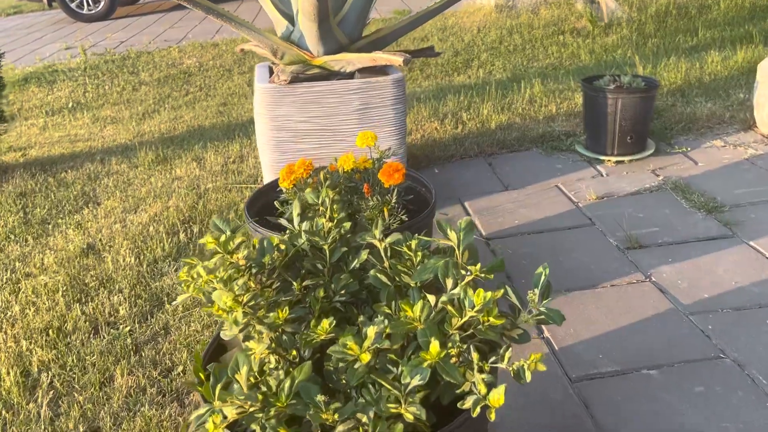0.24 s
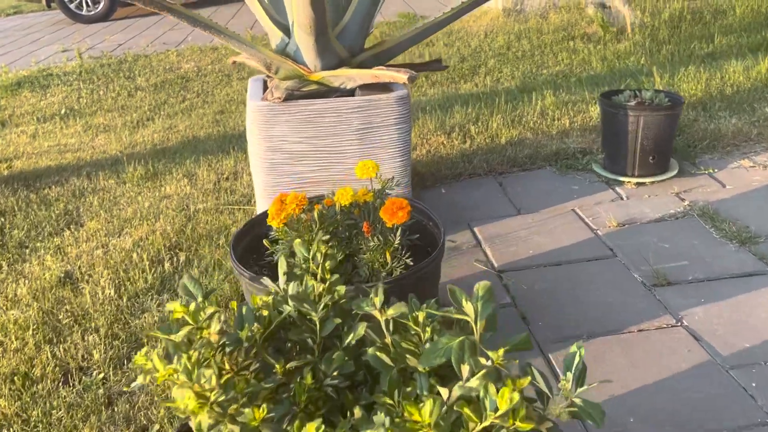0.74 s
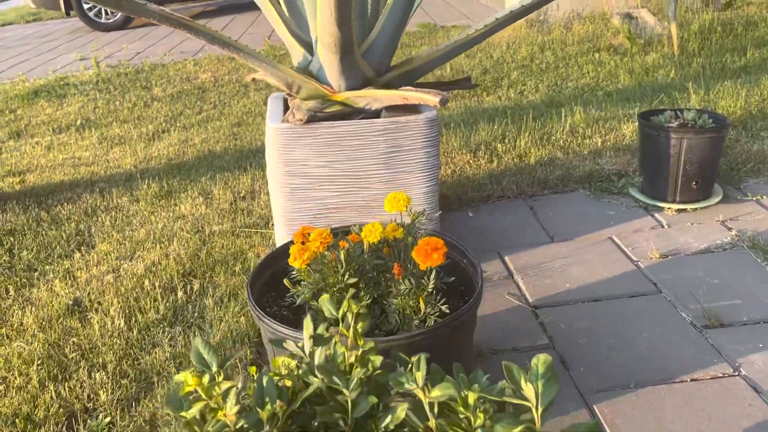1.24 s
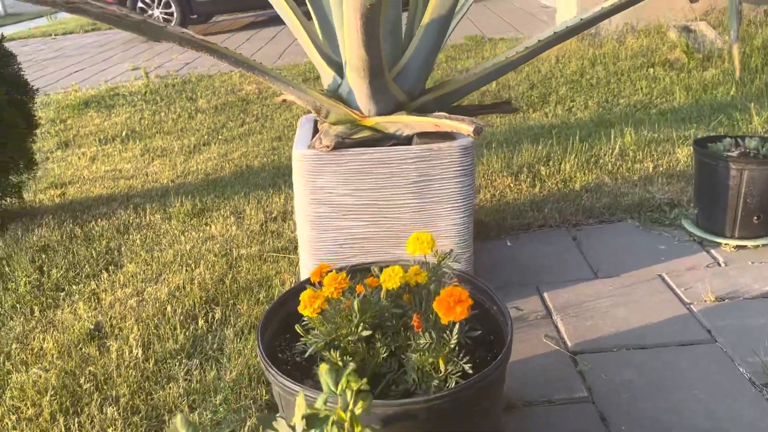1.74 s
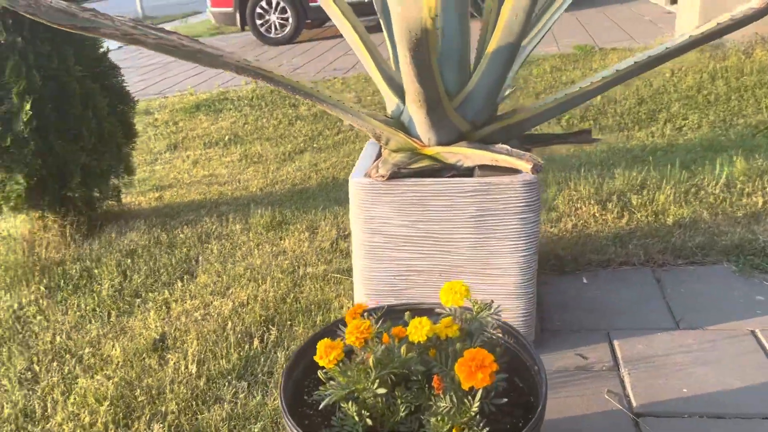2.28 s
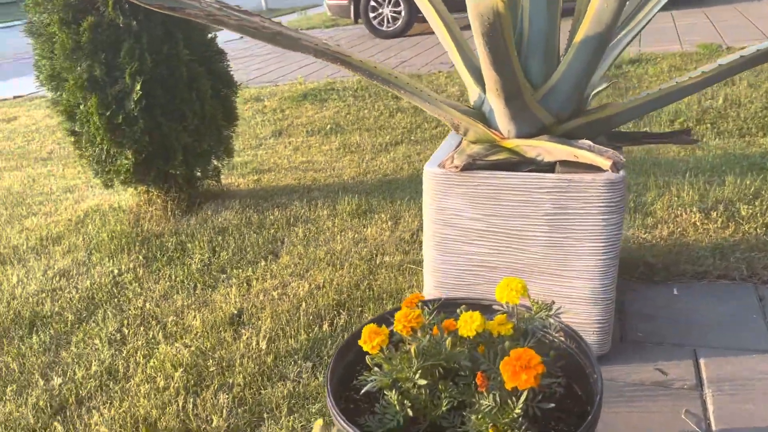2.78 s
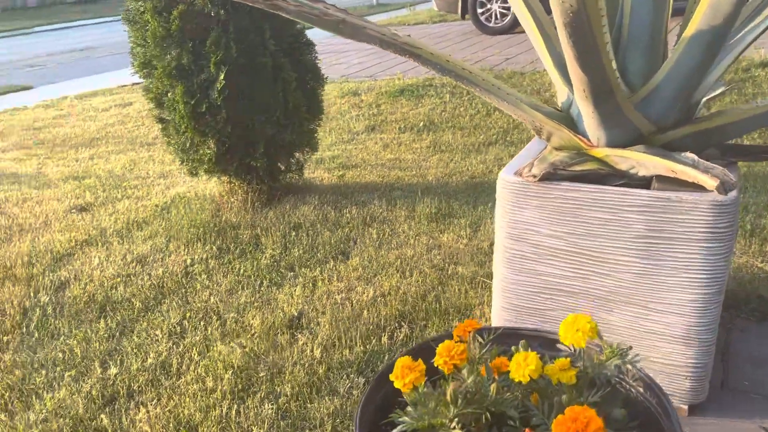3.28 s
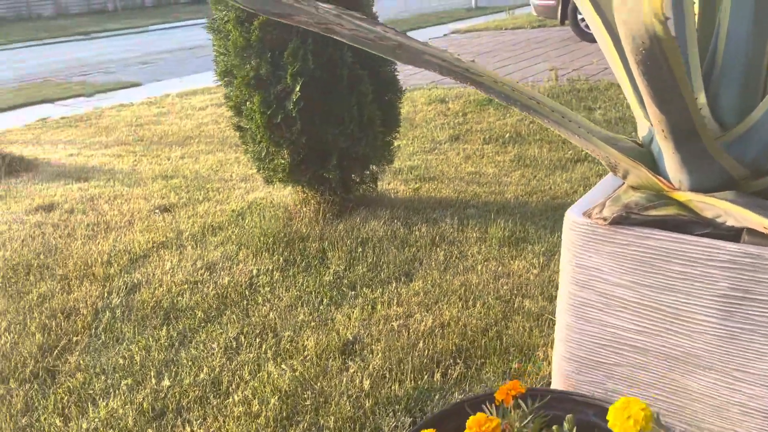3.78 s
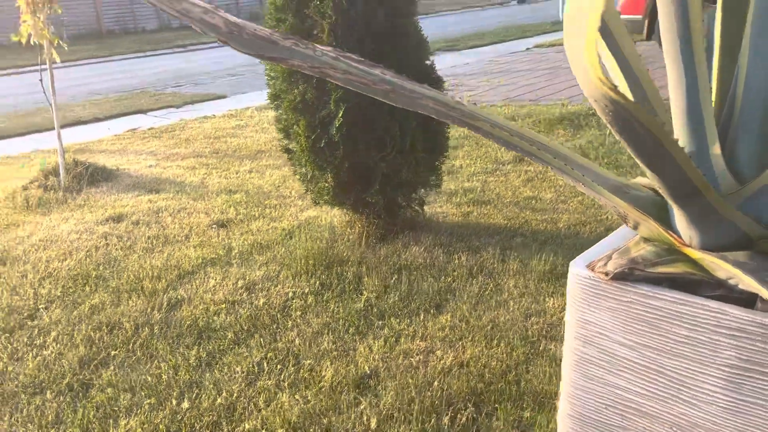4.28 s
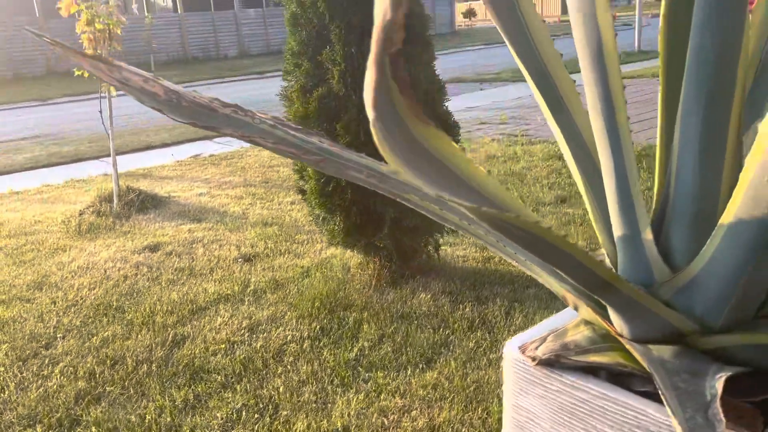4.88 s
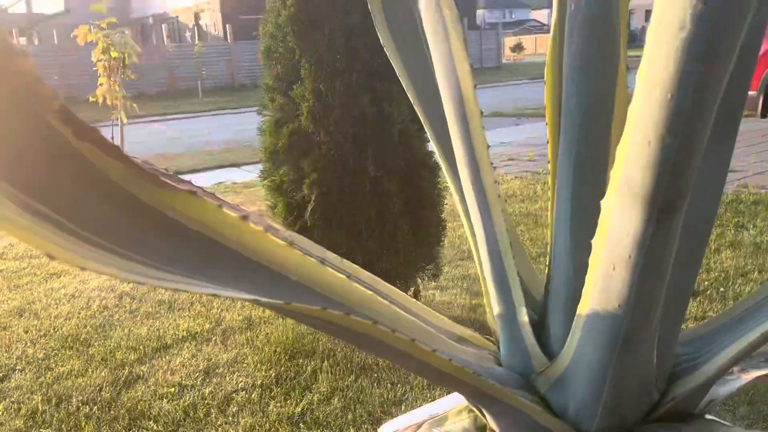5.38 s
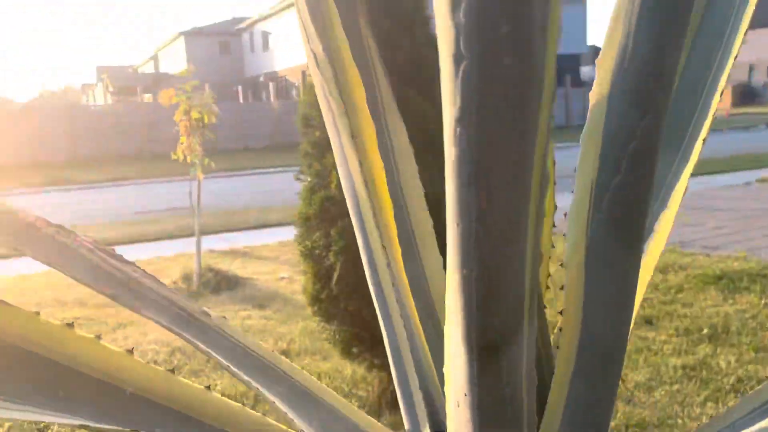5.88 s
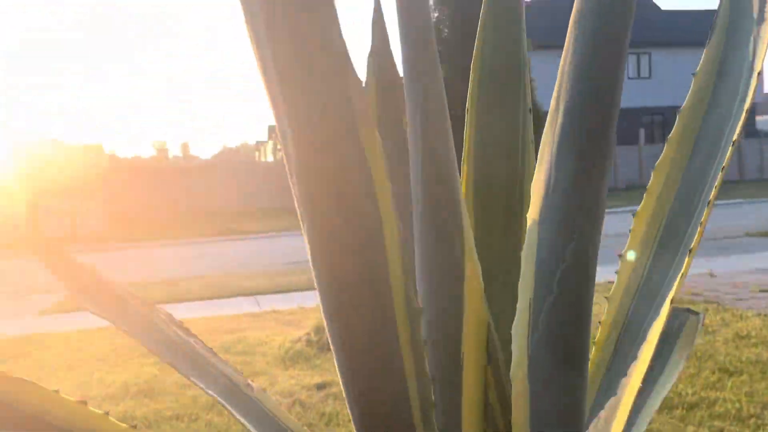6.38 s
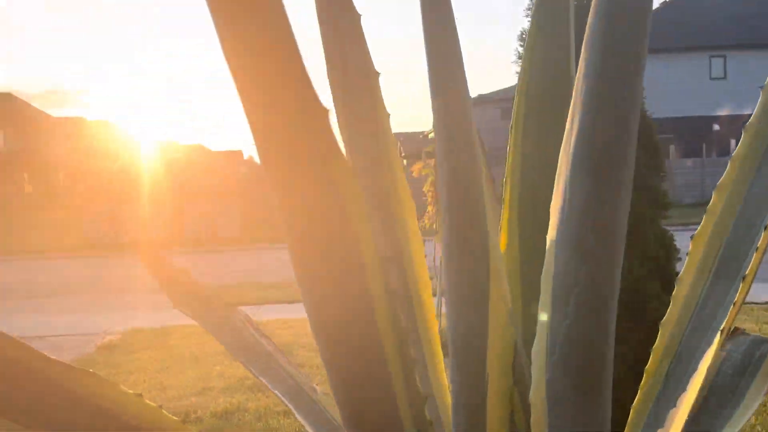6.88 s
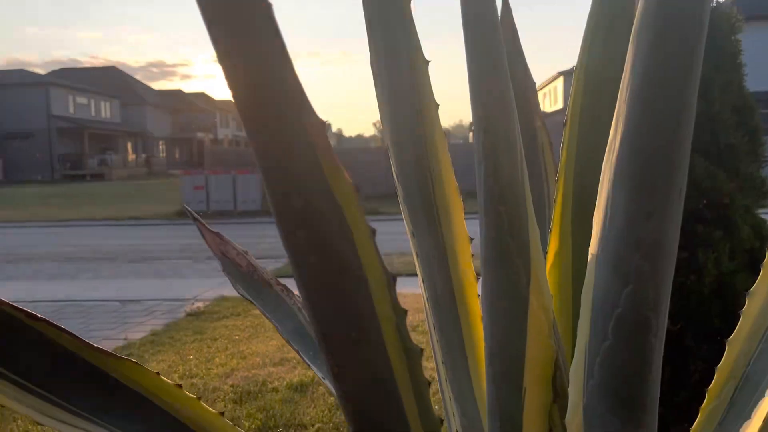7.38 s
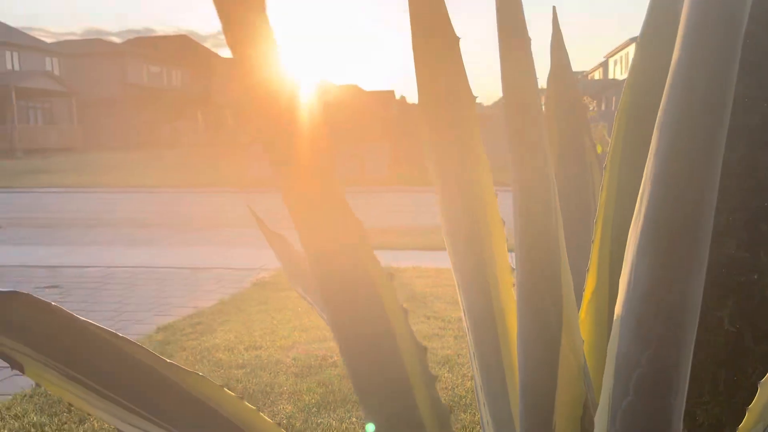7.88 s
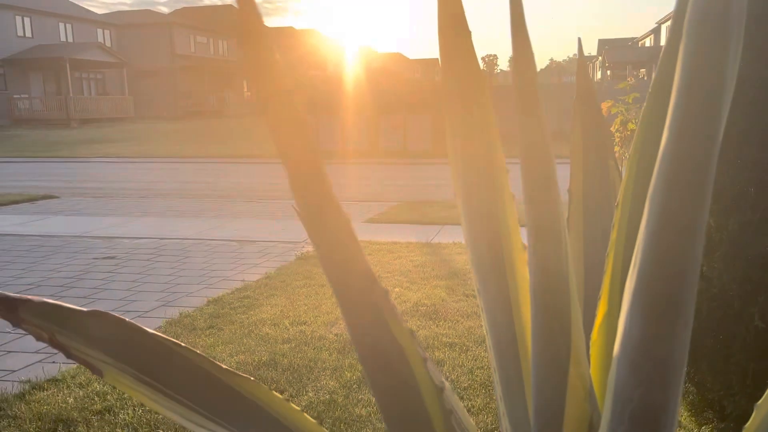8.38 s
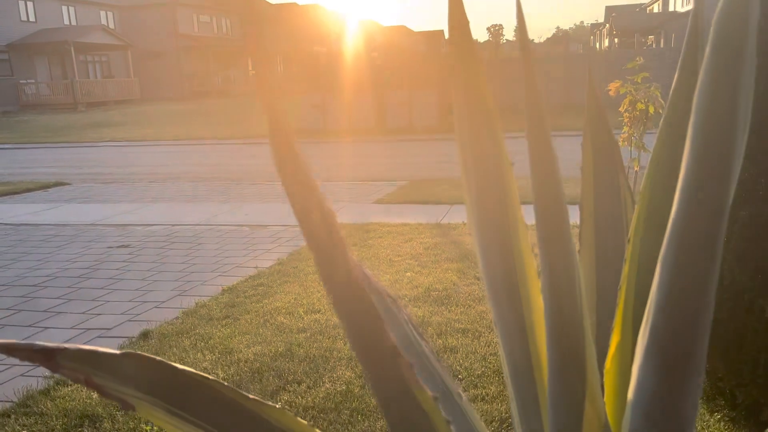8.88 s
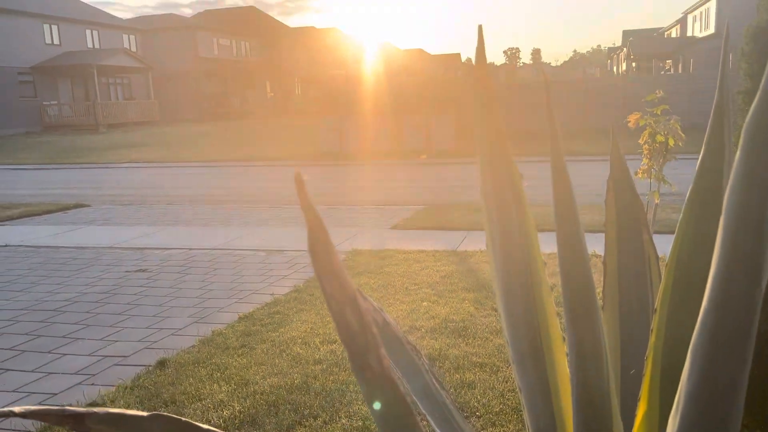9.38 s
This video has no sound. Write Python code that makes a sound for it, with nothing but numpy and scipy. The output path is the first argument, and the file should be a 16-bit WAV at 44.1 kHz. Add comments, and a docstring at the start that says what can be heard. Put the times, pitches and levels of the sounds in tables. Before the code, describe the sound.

Small birds trade slurred whistles and raspy chatter in a suburban yard, over a distant engine's low drone and light scuffing footsteps.

```python
"""Small birds trade slurred whistles, closing flicks, thin high notes, raspy chatter and a dry trill.
They are gliding, unsteady tones, blurred or echoed by leaves and houses in a suburban yard at dawn.
A distant engine (a few sine tones) rises and sags over the town's filtered noise and a faint two-tone hum.
Someone with a camera steps and scuffs over paving and grass, and later clothing or a hand likely rubs:
bursts of filtered, crackling noise. Twice a finger knocks the camera's case, which rings."""
import sys
import numpy as np
from scipy import signal
from scipy.fft import rfft, irfft
from scipy.io import wavfile
from scipy.ndimage import uniform_filter1d

SR = 44100
rng = np.random.default_rng(int(sys.argv[2]) if len(sys.argv) > 2 else 0)


def dump(signal):
    """Clip the signal to [-1, 1] and save it as 16-bit WAV at the path in sys.argv[1]."""
    limited = np.clip(np.atleast_2d(signal).T, -1, 1)
    pcm = np.round(limited * 32767).astype(np.int16)
    wavfile.write(sys.argv[1], SR, pcm)


N = 425124
T = np.arange(N) / SR

# the town's level: (time [s], rumble [dB], wash [dB])
TOWN_LEVELS = [(0, -50.5, -63.5), (.9, -47.5, -61), (2.5, -49, -56.5), (3.2, -44.5, -57.5), (4.3, -47, -58),
               (5.3, -45, -57), (6.5, -48, -58), (7.4, -49.5, -59.5), (8.099, -46, -59.5), (9.64, -47, -58)]
# colour of the town's low rumble and of its higher wash: (frequency [Hz], relative level [dB per Hz])
RUMBLE_COLOUR = [(15, -10), (30, 1.5), (45, -8.5), (60, 4.5), (90, -1.5), (130, -6), (220, -11.5),
                 (320, -18), (500, -28.5), (900, -71.5)]
WASH_COLOUR = [(150, -1), (350, -4.5), (550, -2.5), (900, 2.5), (1300, 0.5), (2000, -4), (3000, -15),
               (4400, -14), (5300, -23.5), (7000, -28), (10000, -40.5), (14000, -40.5), (16000, -65.5)]

# the far engine, one curve a pull: (time [s], firings [per s], first order [dB], third order [dB])
ENGINE_PULLS = [
    [(0, 70.6, -69, -62), (.35, 71.8, -61, -60), (.75, 75.5, -49, -56), (1.15, 77.5, -52.5, -62),
     (1.5, 80, -55, -65)],
    [(1.55, 53.5, -61, -65), (1.9, 57, -41.5, -54.5), (2.35, 58.4, -44.5, -57), (2.57, 59.5, -57.5, -63.5),
     (2.72, 62.6, -37.5, -68.5), (3.0, 68, -49.5, -55.5), (3.3, 71, -40, -52), (3.45, 70.5, -47, -53),
     (3.7, 61.2, -45.5, -65.5), (4.1, 59.2, -46, -61.5), (4.5, 63, -39.5, -61), (5.15, 66.3, -37.5, -53.5),
     (5.4, 64.5, -45, -68), (5.7, 62, -47, -64), (6.1, 60, -59, -61.5)],
    [(6.25, 77.8, -59, -82), (6.42, 77.5, -44, -73), (7.1, 74, -50, -75.5), (7.44, 74, -43, -69),
     (7.52, 74, -52.5, -65.5), (7.75, 74.3, -32.5, -89), (8.01, 75, -49.5, -62), (8.18, 75.5, -38, -60.5),
     (8.35, 76, -41.5, -68), (8.8, 77, -39.5, -78), (9.12, 77.6, -48, -64), (9.64, 79.3, -39.5, -74)],
]
SECOND_DB = -10  # the second order against the mean of its neighbours

# a far machine's tones, before the swell: (frequency [Hz], level [dB])
HUM_TONES = [(628, -74), (1255, -80.5)]
# how the hum swells and sinks: (time [s], change of level [dB])
HUM_SWELL_CURVE = [(0, -1.5), (.6, -2.5), (1, 7), (1.55, 4), (1.9, 0.5), (3.6, 2), (6, 0), (7.05, 4.5),
                   (7.8, -0.5), (8.7, 6), (9.64, 1)]

# scuffs and rubs: shoes scraping and brushing, later (from about 7.96 s) likely clothing or a hand:
# (time [s], length before dying away [s], swell [s], scrape [dB], grit [dB], time to fall 60 dB [s])
SCUFF_EVENTS = [ (0.05, .04, 0.027, -91, -80, .25), (0.329, .012, 0.0054, -56, -63, .11),
                (0.358, 0.073, .017, -68, -79, .26), (0.977, 0.034, .02, -93, -83, .26),
                (1.07, 0.02, 0.013, -85, -65.5, 0.21), (1.637, 0.054, 0.015, -71, -70, 0.42),
                (1.831, .029, .006, -65, -70, .2), (2.156, 0.25, 0.081, -88, -74, 0.3),
                (2.971, .07, 0.028, -71, -77, 1), (3.365, 0.021, 0.016, -66.5, -71, 0.28),
                (3.438, .05, .03, -74, -75, 0.16), (3.961, 0.028, 0.0038, -53.5, -55, 0.19),
                (4.09, 0.23, .04, -91, -87, .3), (4.447, 0.12, 0.077, -90, -80, 0.36),
                (4.597, 0.024, 0.027, -61, -68.5, .18), (4.98, 0.14, 0.041, -78, -83, 0.22),
                (5.138, 0.047, 0.025, -68, -70.5, 0.52), (5.52, 0.023, .01, -78, -72.5, .15),
                (5.986, .05, .025, -74, -67.5, .33), (6.247, .11, .1, -73, -77.5, .2),
                (6.36, .04, 0.038, -66, -69, 0.13), (6.55, 0.13, 0.1, -63, -62.5, 0.31),
                (6.757, .045, 0.0081, -41, -46.5, 0.11), (7.088, 0.039, 0.053, -61, -67, 0.33),
                (7.588, 0.034, 0.016, -54, -58.5, 0.26), (7.866, 0.19, 0.033, -68, -78, 0.11),
                (7.955, 0.18, 0.03, -59, -57, 0.37), (8.144, 0.21, 0.037, -64, -68, 0.44),
                (8.397, .13, 0.036, -69, -61, .053), (8.583, 0.035, 0.011, -77, -78, .05),
                (8.62, 0.068, 0.014, -62, -55, 0.11), (9.043, 0.09, 0.029, -63.5, -68.5, .15),
                (9.25, .098, 0.032, -70, -75, 0.11), (9.294, 0.071, 0.02, -63, -56, 0.22)]
# grit cracking and sharp taps: (time [s], time to fall 60 dB [s], centre [Hz], body [dB], grit [dB])
CLICK_EVENTS = [ (.3268, .011, 900, -37, -70), (.38, .012, 5000, -69, -47), (.4145, .009, 5500, -50, -37),
                (.4495, .009, 4000, -56, -52), (1.028, .008, 5000, -72, -54),
                (1.6705, .014, 6000, -54, -36.5), (1.6855, .012, 6000, -64, -48),
                (1.7108, .014, 3300, -39.5, -37), (1.8336, .012, 3200, -35.5, -22.5),
                (2.17, .015, 4000, -68, -56), (1.84, .017, 3300, -46, -54), (3.011, .015, 1400, -56, -58),
                (3.115, .01, 4000, -75, -59), (3.388, .015, 4000, -62, -59), (3.965, .018, 1400, -46, -47),
                (4.40, .012, 3200, -56.5, -60), (4.475, .01, 4000, -68, -57), (4.5525, .02, 5000, -70, -52),
                (6.034, .024, 4500, -56, -49), (7.2101, .014, 1500, -34.5, -45),
                (7.213, .04, 330, -41, -68), (7.606, .016, 1300, -39.5, -41), (7.618, .016, 1500, -45, -48),
                (8.6215, .006, 2600, -28, -26.5), (9.3215, .018, 780, -35.5, -45)]
# colour of rubbing grit, and the sharper colour of a cracking grain: (frequency [Hz], relative level [dB per Hz])
GRIT_COLOUR = [(500, -22), (3000, -9.5), (6500, 0.5), (8500, -4.5), (10500, -5), (12500, -4.5),
               (14200, -3.5), (16000, -19)]
SNAP_COLOUR = [(500, -26), (3000, -29), (6500, -12.5), (8500, 1), (10500, -5.5), (12500, 1.5), (14200, 2.5),
               (16000, 5.5)]
# a harder press scrapes lower: scrape levels and the centre frequencies that go with them
SOFT_DB, HARD_DB, SOFT_HZ, HARD_HZ = -71, -57.5, 4000, 1300
# single grains snapping in a sliding contact: average rate, size of the surges, time constant of their fading
CRACKLE_PER_S, CRACKLE_DB, CRACKLE_S = 50, 2, .0015

# slurred whistles: (time [s], length [s], opening hook [s], hook [Hz], dip [Hz], crest [Hz],
# hook [dB], dip [dB], climb [dB])
WHISTLE_CALLS = [ (.305, .22, 0.05, 4630, 4030, 4220, -67, -75, -69),
                 (1.2, 0.27, 0.056, 4660, 3970, 4320, -68, -72, -75.5),
                 (1.24, .28, 0.053, 4740, 3950, 4300, -68, -85, -73),
                 (2.095, 0.23, 0.064, 4705, 3910, 4400, -68.5, -71, -57.5),
                 (2.689, 0.3, 0.078, 4700, 4220, 4500, -76, -82, -79.5),
                 (3.42, 0.3, 0.045, 4500, 3870, 4420, -62, -75, -65),
                 (3.46, 0.23, .05, 4560, 4120, 4500, -78, -84, -76),
                 (4.213, 0.24, 0.1, 4700, 4130, 4530, -68.5, -75.5, -70.5),
                 (4.655, 0.26, 0.047, 4540, 3830, 4350, -57, -65, -65.5),
                 (5.09, 0.21, 0.073, 4830, 4190, 4450, -70, -75, -77),
                 (5.94, 0.27, 0.059, 4700, 4140, 4670, -69, -80, -68.5),
                 (5.977, 0.32, 0.037, 4480, 3980, 4490, -59, -72, -65.5),
                 (6.785, .235, .05, 4740, 3960, 4590, -56, -62, -65),
                 (6.825, 0.2, 0.063, 4740, 4280, 4660, -72, -75, -72),
                 (7.453, .185, 0.045, 4740, 4300, 4720, -63, -64.5, -62.5),
                 (7.895, .255, 0.05, 4700, 3930, 4500, -66, -77, -69)]
HOOK_SCOOP, HOOK_TOP = .045, 0.401  # a hook slides up from this share below its top, reached at this share of it
CLIMB_POWER = 1.2  # the climb starts flat and steepens
CREST_DB = 1  # the crest is this much louder than the middle of the climb

# the flicks that close the whistles: (time [s], rise [s], fall [s], top [Hz], end [Hz], level [dB])
FLICK_CALLS = [ (0.503, 0.045, 0.027, 4500, 3800, -67), (1.48, 0.031, 0.07, 4520, 3840, -68.5),
               (1.53, 0.016, 0.089, 4440, 3820, -69.5), (2.345, 0.031, 0.057, 4540, 3580, -63),
               (3.685, 0.024, 0.044, 4430, 3940, -64), (3.72, 0.028, 0.072, 4630, 3970, -67),
               (4.502, 0.021, 0.033, 4650, 4360, -68), (4.756, 0.04, 0.034, 4400, 4100, -72),
               (4.945, 0.013, 0.052, 4430, 3700, -63.5), (5.385, 0.03, .04, 4670, 4560, -74.5),
               (5.47, .02, 0.082, 4360, 3920, -84), (6.234, 0.022, 0.087, 4770, 4260, -69),
               (6.239, 0.018, 0.078, 4480, 3470, -65.5), (6.315, .02, 0.068, 4490, 4100, -66),
               (7.049, 0.023, .065, 4790, 4130, -66), (7.063, 0.011, 0.055, 4370, 3770, -60),
               (7.086, 0.011, 0.065, 4700, 4050, -71), (7.15, 0.0413, 0.039, 4280, 4180, -66.5),
               (7.272, 0.015, 0.054, 4360, 3730, -67.5), (7.667, 0.039, 0.045, 4760, 4420, -69.5),
               (8.154, 0.019, 0.059, 4600, 3780, -61)]
FLICK_SCOOP_HZ_PER_S = 4600  # average pace of a flick's rise
FLICK_POWER, FLICK_END_DB = 1.5, -0.5  # it falls ever faster; its end against its start

# thin notes: (time [s], length [s], top pitch [Hz], level [dB])
PEEP_CALLS = [(0.506, 0.063, 6700, -81.5), (0.9, 0.25, 5610, -79), (1.088, 0.23, 5400, -81),
              (2.232, 0.044, 6950, -77), (3.412, 0.036, 6660, -74), (4.554, 0.15, 5770, -77),
              (4.702, 0.063, 5570, -76), (6.42, 0.021, 5700, -72), (6.55, 0.033, 5650, -74),
              (7.236, 0.025, 5780, -71), (8.39, 0.065, 4800, -69)]
PEEP_ARCH = 0.04  # each starts and ends this share below its top

# three-syllable chatter: (time [s], first syllable [dB], second [dB], third [dB])
CHATTER_CALLS = [(.615, -74, -63, -62), (2.531, -68, -61, -64.5), (3.765, -69, -59, -60),
                 (4.892, -65, -55, -59), (6.326, -69, -62, -58), (7.712, -59, -56, -56),
                 (8.837, -58, -54.5, -57)]
# its syllables, a drop, a two-voiced zigzag and a rise; each sweep:
# (time after the start [s], length [s], start [Hz], middle [Hz], end [Hz], change of level [dB])
SYLLABLE_SWEEPS = [
    [(0, .028, 4600, 4150, 3300, 0)],
    [(.032, .032, 4500, 4900, 4650, -13), (.046, .034, 3050, 3200, 3950, -6),
     (.057, .027, 4750, 3900, 3000, 0)],
    [(.112, .038, 2950, 3700, 4000, 0)],
]
RASP_HZ, RASP_SHARE = 260, .035  # shakes a second, and their share of the pitch
LEAVES_T60, LEAVES_DIRECT_DB, LEAVES_WET_DB = .12, -2.5, -4  # time to fall 60 dB [s], clear call, blur

# a dry trill of even ticks, loudest midway: start, spacing, base pitch, top level, ends against the top
TRILL_S, TRILL_GAP_S, TRILL_HZ, TRILL_DB, TRILL_ENDS_DB = 5.639, 0.063, 2900, -58.5, -3

# how the camera's case rings: (frequency [Hz], relative level [dB], time to fall 60 dB [s])
CASE_RINGS = [(230, -32, 0.054), (670, -20, 0.01), (728, -25.5, 0.027), (1410, -30.5, 0.023),
              (2440, -44.5, 0.016)]
# a finger bumps the case: (time [s], gain on the ring [dB])
KNOCK_EVENTS = [(7.2115, -19.5), (8.6228, -3.5)]
# the hand shifts on the case: (time [s], length [s], centre [Hz], level [dB])
RUB_EVENTS = [(9.046, 0.75, 397, -61.5), (9.311, 0.07, 760, -57.5)]
RUB_GRIT_DB = -23  # skin carries little grit: its level against the body of the rub
RUB_RISE, RUB_T60 = 0.11, .22  # share of the length spent swelling; time to fall 60 dB [s]

# how alike far noise is at the two microphone ports: (frequency [Hz], likeness, held within 0-1)
PORT_LIKENESS = [(60, 4), (130, 0.93), (290, 0.78), (640, 0.29), (1400, 0.24), (4000, 0.27), (12000, 2)]
# how far the right port leads: (frequency [Hz], phase [radians])
PORT_LEAD = [(400, 0), (1000, 1.7), (1550, 2.5), (1900, 5.4), (4600, 5.6), (5500, 7.5), (6800, 8),
             (8200, 9.4), (9300, 9.7), (10500, 12.1), (12700, 12.7), (14500, 15.4)]
# left level minus right level: (frequency [Hz], difference [dB])
PORT_TILT = [(60, 1.3), (500, .9), (1450, -1.5), (2000, 3.7), (4200, 4.6), (5200, 2), (6500, 3), (8000, 0)]
EDGE_HZ = 15900  # upper edge of the sound


def amp(db):
    """Turns decibels into gain."""
    return 10 ** (np.asarray(db) / 20)


def unit(x):
    """Scales a sound to an average strength (rms) of 1."""
    return x / np.sqrt(np.mean(x ** 2) + 1e-20)


def read(points, hz):
    """Reads a table between its points, on a log-frequency axis."""
    f, value = np.transpose(points)
    return np.interp(np.log(hz + 1), np.log(f + 1), value)


def add(mix, s, sound):
    """Mixes a sound in at time s."""
    part = mix[max(round(s * SR), 0):][:len(sound)]
    part += sound[:len(part)]


def colour(x, curve):
    """Filters by a gain that depends on frequency."""
    size = x.shape[-1]
    return irfft(rfft(x) * curve(np.fft.rfftfreq(size, 1 / SR)), size)


def drift(size, hz):
    """Slow random wandering of about rms 1, with up to about hz changes a second."""
    noise = rng.standard_normal(size + SR // 4)
    return unit(colour(noise, lambda f: np.exp(-(f / hz) ** 2)))[:size]


def air(spectrum, level_db, patchy_db):
    """Far noise whose colour drifts in patches, only partly alike at the two ports."""
    hz = np.fft.rfftfreq(2048, 1 / SR)
    a, b, c, d, patches = rng.standard_normal((5, N // 512 + 5, len(hz)))
    patches = uniform_filter1d(patches, size=10, axis=0)  # smooth over time
    patches = unit(uniform_filter1d(patches, size=16, axis=1))  # smooth over frequency
    same = np.clip(read(PORT_LIKENESS, hz), 0, 1)
    left, other = a + 1j * b, c + 1j * d
    right = same * left + np.sqrt(1 - same ** 2) * other
    z = np.array([left, right]) * amp(read(spectrum, hz) + patchy_db * patches)
    noise = signal.istft(z.swapaxes(1, 2), nperseg=2048, noverlap=1536)[1][:, :N]
    return amp(level_db) * unit(noise)


def town():
    """The town blends a low rumble with a higher wash of noise, each rising and sinking slowly."""
    s, rumble_db, wash_db = np.transpose(TOWN_LEVELS)
    rumble = air(RUMBLE_COLOUR, np.interp(T, s, rumble_db), patchy_db=1.6)
    wash = air(WASH_COLOUR, np.interp(T, s, wash_db), patchy_db=2.0)
    return rumble + wash


def engine():
    """A far exhaust sounds at its firing rate and two multiples (orders), throbbing a little."""
    out = np.zeros(N)
    for pull in ENGINE_PULLS:
        s, rate_hz, first_db, third_db = np.transpose(pull)
        t = np.arange(s[0], s[-1], 1 / SR)
        unsteady_hz = np.interp(t, s, rate_hz) * (1 + 0.0046 * drift(len(t), 13.2))
        turns = np.cumsum(unsteady_hz) / SR
        second_db = (first_db + third_db) / 2 + SECOND_DB
        tone = np.zeros(len(t))
        for k, db in enumerate([first_db, second_db, third_db], 1):
            throb_db = k * 0.68 * drift(len(t), 5.0)
            tone += amp(np.interp(t, s, db) + throb_db) * np.sin(2 * np.pi * k * turns)
        fade = np.clip(np.minimum(t - s[0], s[-1] - t) / 0.044, 0, 1)
        add(out, s[0], np.sqrt(2) * tone * fade)
    return out


def hum():
    """A far machine gives two faint tones that waver separately at each port and swell together."""
    def wavering(hz):
        turns = np.cumsum(hz * (1 + .0025 * drift(N, 15))) / SR
        return amp(1.8 * drift(N, 2.5)) * np.sin(2 * np.pi * turns)

    ports = [sum(amp(db) * wavering(hz) for hz, db in HUM_TONES) for _ in range(2)]
    swell = amp(np.interp(T, *np.transpose(HUM_SWELL_CURVE)))
    return np.sqrt(2) * np.array(ports) * swell


def stroke(length, swell_s, t60):
    """Strength of a sliding contact: it swells, grips and slips, then dies."""
    t = np.arange(int((length + .4) * SR)) / SR
    swell = np.sin(np.pi / 2 * np.minimum(t / swell_s, 1)) ** 2
    dying = amp(-60 * np.maximum(t - length, 0) / t60)
    grip = amp(1.4 * drift(len(t), 40))
    return swell * dying * grip


def crackle(size, per_s, surge_db):
    """Brief random surges on a steady strength, one for each grain that snaps; a few are large."""
    heights = np.minimum(rng.exponential(0.23, size), 2)
    snaps = heights * (rng.random(size) < per_s / SR)
    surges = signal.lfilter([1], [1, -np.exp(-1 / (CRACKLE_S * SR))], snaps)
    return unit(1 + amp(surge_db) * surges)


def crunch(envelope, centre_hz, body_db, grit_db, width, grain_db, grit_spectrum=GRIT_COLOUR):
    """Two surfaces rub: noise with a broad resonance of the contact plus fine grit."""
    size = len(envelope)
    grains = rng.standard_normal((2, size)) * amp(grain_db * drift(size, 2100))
    top_hz = min(5 * centre_hz, 8000)  # low contacts carry little treble

    def hump(f):
        peak = (1 + (np.log((f + 1) / centre_hz) / width) ** 2) ** -.62
        less_bass = f / np.hypot(f, centre_hz / 3)
        return peak * less_bass / np.hypot(1, (f / top_hz) ** 2)

    body = unit(colour(grains[0], hump))
    grit = unit(colour(grains[1], lambda f: amp(read(grit_spectrum, f))))
    return envelope * (amp(body_db) * body + amp(grit_db) * grit)


def mottle(x, patchy_db):
    """Shifts the colour from moment to moment, as other parts of the surfaces come into contact."""
    z = signal.stft(x, nperseg=256)[2]
    patches = uniform_filter1d(rng.standard_normal(z.shape), size=9, axis=0)
    patches = unit(uniform_filter1d(patches, size=4, axis=1))
    return signal.istft(z * amp(patchy_db * patches), nperseg=256)[1][:len(x)]


def steps():
    """Soles, and later likely clothing or a hand, scuff in swelling strokes; grit cracks, grass rustles."""
    out, t = np.zeros(N), np.arange(SR // 8) / SR
    for s, length, swell_s, body_db, grit_db, t60 in SCUFF_EVENTS:
        envelope = stroke(length, swell_s, t60)
        envelope = envelope * crackle(len(envelope), CRACKLE_PER_S, CRACKLE_DB)
        centre_hz = np.interp(body_db, [SOFT_DB, HARD_DB], [SOFT_HZ, HARD_HZ])
        width = np.interp(body_db, [-53, -43], [.45, .13])  # a hard press rings more narrowly
        scuff = crunch(envelope, centre_hz, body_db, grit_db, width, grain_db=3)
        add(out, s, mottle(scuff, patchy_db=2.5))
    for s, t60, centre_hz, body_db, grit_db in CLICK_EVENTS:
        snap = np.minimum(t / .0003, 1) * amp(-60 * t / t60)
        click = crunch(snap, centre_hz, body_db, grit_db, width=.5, grain_db=.8, grit_spectrum=SNAP_COLOUR)
        add(out, s, click)
    grass = amp(2.3 * drift(N, 6)) * crackle(N, per_s=14, surge_db=14)
    return out + crunch(grass, centre_hz=3500, body_db=-93.0, grit_db=-98, width=0.29, grain_db=2.5)


def sing(hz, waver, flutter_db):
    """A bird's near-pure tone, unsteady in pitch and strength."""
    turns = np.cumsum(hz * (1 + waver * drift(len(hz), 110))) / SR
    flutter = amp(flutter_db * drift(len(hz), 42))
    return np.sqrt(2) * np.sin(2 * np.pi * turns) * flutter


def whistles():
    """Each whistle's pitch hooks over, drops to a dip and climbs slowly."""
    out = np.zeros(N)
    for s, length, hook_s, hook_hz, dip_hz, crest_hz, hook_db, dip_db, climb_db in WHISTLE_CALLS:
        t = np.arange(int(length * SR)) / SR
        over = (t / hook_s - HOOK_TOP) / (1 - HOOK_TOP)
        hook = np.cos(np.pi / 2 * np.clip(over, 0, 1)) ** 2  # 1 until its top, then down to 0
        scoop = 1 - HOOK_SCOOP * np.maximum(1 - t / (HOOK_TOP * hook_s), 0) ** 2
        climb = np.maximum((t - hook_s) / (length - hook_s), 0) ** CLIMB_POWER
        hz = (dip_hz + (hook_hz - dip_hz) * hook + (crest_hz - dip_hz) * climb) * scoop
        db = np.interp(climb, [0, .1, .5, 1], [dip_db, dip_db, climb_db, climb_db + CREST_DB])
        db = db + (hook_db - dip_db) * hook
        tone = sing(hz, waver=.004, flutter_db=3) * signal.windows.tukey(len(t), .1)
        add(out, s, amp(db) * tone)
    return out


def flicks():
    """After a short break the bird closes with a note whose pitch arches and drops away."""
    out = np.zeros(N)
    for s, rise_s, fall_s, top_hz, end_hz, db in FLICK_CALLS:
        t = np.arange(-rise_s, fall_s, 1 / SR)  # 0 at the top of the arch
        fall = np.maximum(t / fall_s, 0) ** FLICK_POWER
        scoop_hz = FLICK_SCOOP_HZ_PER_S * np.minimum(t, 0) ** 2 / rise_s
        hz = top_hz - scoop_hz + (end_hz - top_hz) * fall
        tone = sing(hz, waver=.004, flutter_db=2.8) * signal.windows.tukey(len(t), .25)
        add(out, s, amp(db + FLICK_END_DB * fall) * tone)
    return out


def peeps():
    """Birds further off give thin notes whose pitch arches up and back."""
    out = np.zeros(N)
    for s, length, top_hz, db in PEEP_CALLS:
        u = np.linspace(-1, 1, int(length * SR))
        tone = sing(top_hz * (1 - PEEP_ARCH * u ** 2), waver=0.0085, flutter_db=3.0)
        add(out, s, amp(db) * tone * signal.windows.tukey(len(u), .5))
    return out


def chatter():
    """Steep sweeps, at times two voices at once, made raspy by a fast shake of the pitch."""
    out = np.zeros(N)
    for s, *levels_db in CHATTER_CALLS:
        for db, sweeps in zip(levels_db, SYLLABLE_SWEEPS):
            for after, length, start_hz, middle_hz, end_hz, step_db in sweeps:
                t = np.arange(int(length * SR)) / SR
                bend = np.polyfit([0, .5, 1], [start_hz, middle_hz, end_hz], 2)
                shake = 1 + RASP_SHARE * np.sin(2 * np.pi * (RASP_HZ * t + rng.random()))
                hz = np.polyval(bend, t / length) * shake
                tone = sing(hz, waver=.015, flutter_db=2.5) * np.hanning(len(t))
                add(out, s + after, amp(db + step_db) * tone)
    return out


def leaves(x):
    """Foliage scatters a call into a dense, short blur, different at each port."""
    t = np.arange(SR // 5) / SR
    scatter = rng.standard_normal((2, len(t))) * amp(-60 * t / LEAVES_T60)
    scatter = scatter / np.linalg.norm(scatter[0])
    blur = signal.fftconvolve(x[None], scatter, axes=1)[:, :N]
    return amp(LEAVES_DIRECT_DB) * x + amp(LEAVES_WET_DB) * blur


def yard(x, t60, wet_db, echo_db):
    """House walls send back three echoes, along with a thin scattered tail."""
    t = np.arange(SR) / SR
    sparse = rng.standard_normal((2, SR)) * (rng.random((2, SR)) < 1500 / SR)
    scatter = sparse * amp(-60 * t / t60) * (t > .012)
    tail = amp(wet_db) * scatter / np.linalg.norm(scatter[0])
    for s, db in [(.021, -1.5), (.048, -0.5), (.085, -4.5)]:  # (delay [s], change of level [dB])
        tail[:, round(s * SR)] += amp(echo_db + db)
    return signal.fftconvolve(x[None], tail, axes=1)[:, :N]


def trill(count):
    """An even run of steep, very short falling chirps that swells and fades."""
    out = np.zeros(N)
    hz = TRILL_HZ * np.geomspace(1.9, .55, int(0.0046 * SR))
    tick = np.sqrt(2) * np.sin(2 * np.pi * np.cumsum(hz) / SR) * np.hanning(len(hz))
    for k, u in enumerate(np.linspace(-1, 1, count)):
        add(out, TRILL_S + k * TRILL_GAP_S, amp(TRILL_DB + TRILL_ENDS_DB * u ** 2) * tick)
    return out


def handling():
    """A finger knocks the camera's case, which rings at fixed pitches; the hand rubs softly over it."""
    out, t = np.zeros(N), np.arange(SR // 8) / SR
    ring = sum(amp(db - 60 * t / t60) * np.sin(2 * np.pi * hz * t) for hz, db, t60 in CASE_RINGS)
    for s, db in KNOCK_EVENTS:
        add(out, s, amp(db) * ring)
    for s, length, centre_hz, db in RUB_EVENTS:
        envelope = stroke(length, RUB_RISE * length, RUB_T60)
        add(out, s, crunch(envelope, centre_hz, db, db + RUB_GRIT_DB, width=0.15, grain_db=4.5))
    return out


def scene():
    """Birds, scuffs and rubs and the hand on the camera with their echoes, the engine, hum and town."""
    birds = whistles() + flicks() + peeps() + trill(count=8)
    rasps = chatter()
    near = steps() + handling()
    echoes = yard(birds, t60=.7, wet_db=-4, echo_db=-14)
    echoes = echoes + yard(rasps, t60=.7, wet_db=-5, echo_db=-18)
    echoes = echoes + yard(near, t60=.2, wet_db=-18, echo_db=-33)
    return town() + birds + leaves(rasps) + near + echoes + engine() + hum()


def record(dry):
    """The two microphone ports differ in level and phase; then the highest treble is cut."""
    left = colour(dry[0], lambda f: amp(read(PORT_TILT, f) / 2))
    right = colour(dry[1], lambda f: amp(-read(PORT_TILT, f) / 2) * np.exp(1j * read(PORT_LEAD, f)))
    low_pass = signal.firwin(511, EDGE_HZ, window=("kaiser", 9), fs=SR)
    return signal.oaconvolve(np.array([left, right]), low_pass[None], "same")


dry = scene()
out = record(dry)
dump(out)
```